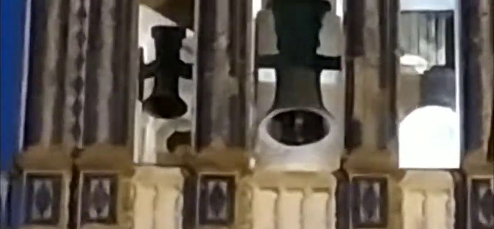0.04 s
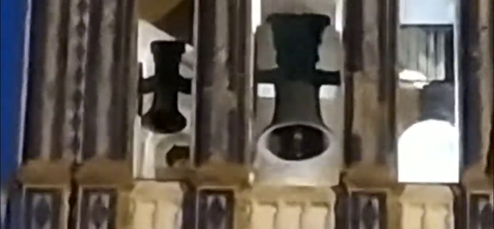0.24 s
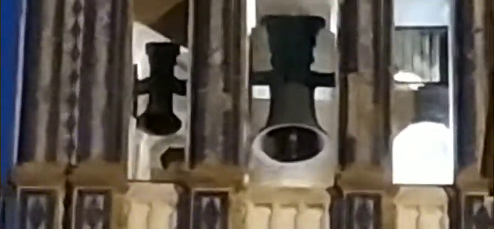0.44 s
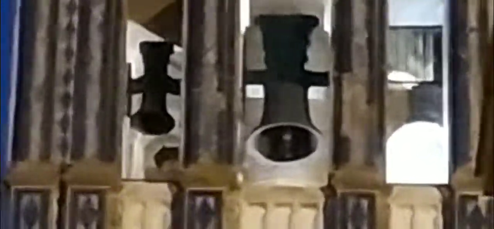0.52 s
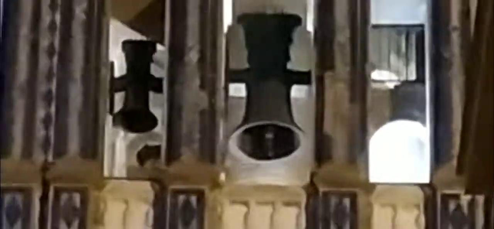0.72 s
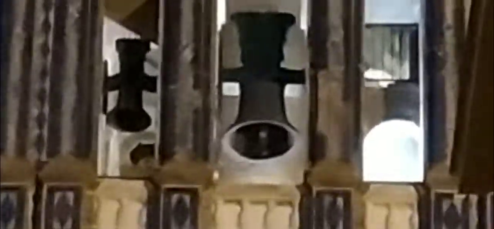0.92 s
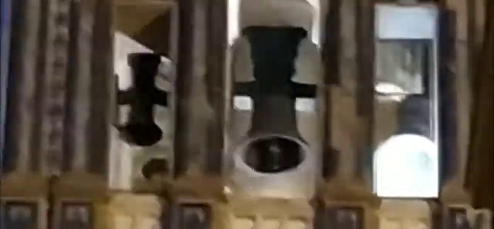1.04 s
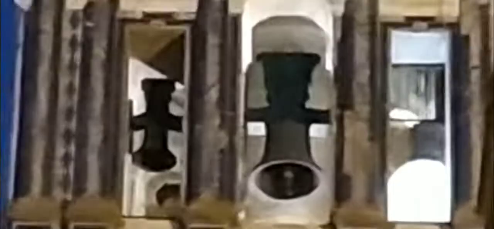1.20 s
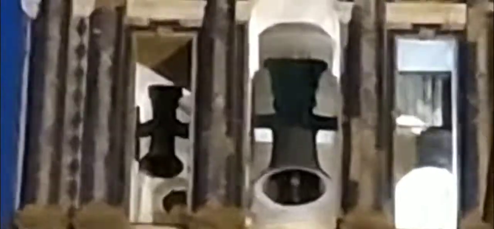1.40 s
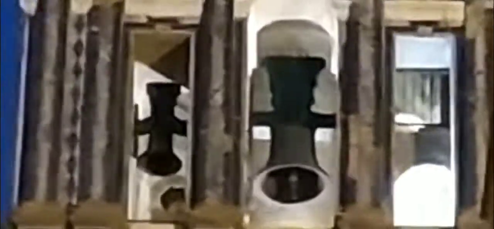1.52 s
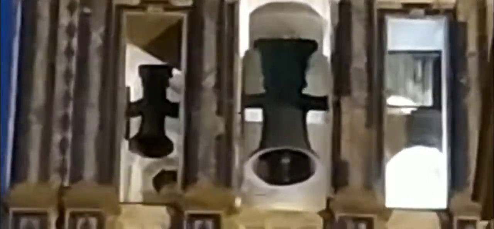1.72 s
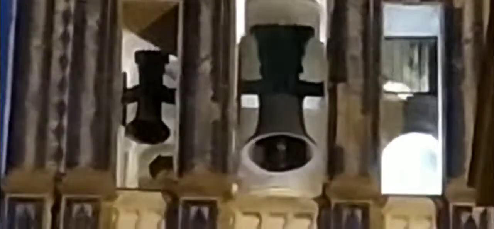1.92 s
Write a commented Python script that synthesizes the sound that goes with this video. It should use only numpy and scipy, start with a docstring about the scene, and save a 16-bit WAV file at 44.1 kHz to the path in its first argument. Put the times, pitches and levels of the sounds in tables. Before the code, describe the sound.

A large church bell is struck once at about 0.15 seconds, over quiet night air and a faint hum from earlier ringing. The clang echoes around the stone tower and square, then rings on in wavering tones. One high tone swells near 0.7 seconds. From about 1.2 seconds a faint rustle flickers close on the left, while the fading bell is still ringing at 2 seconds.

```python
"""Night air hangs over a square, with a faint hum left from earlier bell ringing.
At 0.15 s the clapper strikes a large church bell once, high in a stone tower, and the belfry and
the square smear the clang. The bronze rings on in long, beating tones and a crowd of short ones.
Half a second after the blow one high tone flares up. From about 1.2 s, as the bell fades,
a soft rustle comes up close by on the left."""
import sys
import numpy as np
from scipy import signal
from scipy.io import wavfile
from scipy.ndimage import uniform_filter1d

SR = 44100
rng = np.random.default_rng(int(sys.argv[2]) if len(sys.argv) > 2 else 0)


def dump(signal):
    """Clip the signal to [-1, 1] and save it as 16-bit WAV at the path in sys.argv[1]."""
    limited = np.clip(np.atleast_2d(signal).T, -1, 1)
    pcm = np.round(limited * 32767).astype(np.int16)
    wavfile.write(sys.argv[1], SR, pcm)


N = 85995
TIME = np.arange(N) / SR
STRIKE_S = .151


def amp(db):
    """Turns decibels into a number to multiply by."""
    return 10 ** (np.asarray(db) / 20)


def evened(x):
    """Scales a signal to an average (rms) size of 1."""
    return x / np.sqrt(np.mean(abs(x) ** 2) + 1e-20)


def read(table, hz):
    """Looks up a frequency in a table, sliding between rows by pitch."""
    row_hz, value = np.transpose(table)
    return np.interp(np.log(hz + 1), np.log(row_hz + 1), value)


def sides(pan_db):
    """Left and right gains with the same total power; positive leans left."""
    gains = np.array([amp(pan_db / 2), amp(-pan_db / 2)])
    return gains / np.sqrt(np.mean(gains ** 2, 0))


def swell(t, rise_s):
    """A smooth rise from 0 to 1."""
    return np.sin(np.pi / 2 * np.clip(t / rise_s, 0, 1)) ** 2


def fade(t, fade_s):
    """Dies away from time zero, losing 60 dB in each fade time."""
    return np.exp(-np.log(1000) * np.maximum(t, 0) / fade_s)


# How alike noise is on the left and right: (frequency [Hz], likeness [0 to 1])
SIDE_LIKENESS = [(30, 0.58), (150, 0.53), (1000, 0.64), (4000, 0.14), (12000, .2)]

def noise(colour, shape=None, size=1024):
    """Stereo noise with a given colour and an rms of 1, then multiplied by shape(hz, t) if given."""
    hop = size // 4
    hz, t = np.fft.rfftfreq(size, 1 / SR), np.arange(N // hop + 5) * hop / SR
    a, b, c, d = rng.standard_normal((len(t), len(hz), 4)).T
    likeness = read(SIDE_LIKENESS, hz)[:, None]
    left = a + 1j * b
    right = likeness * left + np.sqrt(1 - likeness ** 2) * (c + 1j * d)
    bands = np.array([left, right]) * amp(read(colour, hz))[:, None]
    to_wave = lambda z: signal.istft(z, nperseg=size, noverlap=size - hop)[1][:, :N]
    scale = to_wave(bands).std()
    if shape:
        bands = bands * shape(hz, t)
    return to_wave(bands) / scale


# The colour of the night air: (frequency [Hz], relative level [dB])
AIR_COLOUR = [(15, -59), (25, -22), (75, -9.5), (109, -11.5), (146, -13), (219, -15), (927, -23),
              (1030, -29), (1150, -25.5), (1720, -29.5), (15000, -51.5)]

def night_air(level_db=-55.5):
    """A steady, low hush, a little to the right."""
    return amp(level_db) * noise(AIR_COLOUR, size=2048) * sides(pan_db=-3)[:, None]


# Tones still sounding from earlier strokes: (frequency [Hz], level [dB], fade time [s])
HUM_TONES = [(145.4, -55, 55), (157, -61.5, 120), (324.3, -56.5, 30), (401.5, -58.5, 26), (638, -64, 13),
             (782, -64.5, 3.6), (963, -65, 4)]

def lingering_hum():
    """The faint hum of bronze that is already ringing."""
    return sum(amp(db) * fade(TIME, fade_s) * np.sin(2 * np.pi * (hz * TIME + rng.random()))
               for hz, db, fade_s in HUM_TONES)


# The colour of the clang in the belfry: (frequency [Hz], relative level [dB])
CLANG_COLOUR = [(60, -46), (200, -13), (500, -20.5), (750, -9.5), (1400, -2), (2400, -11.5), (4000, -5),
                (5400, -6.5), (7000, -32.5), (9000, -20.5), (12000, -37), (15000, -65)]
# How long the clang lasts: (frequency [Hz], fade time [s])
CLANG_FADE = [(200, 1.5), (800, 1.05), (2000, 1.0), (5000, .7), (8000, .33), (13000, .26)]
# The clang's narrow, metallic peaks and dips: (frequency [Hz], typical depth [dB])
CLANG_PEAKS = [(300, 1), (1500, 2.5), (4000, 4.5), (7000, 6), (12000, 7)]
# Which way the clang and the short tones lean: (frequency [Hz], left minus right [dB])
STRIKE_PAN = [(100, 0), (500, 1.5), (1500, 1), (2800, -1), (4000, -10), (5000, -3.5), (6500, -7.5),
              (8000, 9), (14000, 22)]

def clang(gain_db=-29.5):
    """The clapper's crash, hard at first and then scattered by the stonework."""
    def metallic_fade(hz, times):
        ripple = evened(uniform_filter1d(rng.standard_normal(len(hz)), size=2))
        peaks = amp(read(CLANG_PEAKS, hz) * ripple)
        peaks /= np.sqrt(uniform_filter1d(peaks ** 2, size=12))  # keeps the overall colour
        gains = peaks * sides(read(STRIKE_PAN, hz))
        return gains[:, :, None] * fade(times - STRIKE_S, read(CLANG_FADE, hz)[:, None])

    t = TIME - STRIKE_S
    direct = amp(-15) * swell(t + .005, rise_s=.00084)  # weak, and 5 ms ahead of the echoes
    crack = amp(-11) * fade(t, fade_s=.053)  # the hard first instant
    echoes = swell(t, rise_s=.0076) * (1 + crack)
    return amp(gain_db) * (direct + echoes) * noise(CLANG_COLOUR, metallic_fade)


# The bell's strong tones:
# (frequency [Hz], base level [dB], fade time [s], swell time [s], left minus right [dB])
BELL_TONES = [(320.3,-44,30,0.13,-0.5),(386.6,-45.5,14,0.16,2),(401.3,-54.5,12.5,0.11,-10),(418.3,-52,19,0.14,6),(620,-51.5,8.6,0.013,-10.5),(675.9,-35.5,5.08,0.0034,-1),(709.6,-45,4.4,0.038,12),(760.5,-33,3.22,0.24,-4.5),(850.7,-41.5,4.13,0.057,1.5),(891.3,-39,2.5,0.074,-8),(904.9,-38.5,1.8,0.062,-2.5),(920,-37,1,.05,1),(1027.7,-33,3.92,0.26,-3.5),(1053.7,-41,5.1,.17,-8),(1210,-39,2.1,0.11,-7.5),(1257,-46,3.2,0.11,4),(1280,-39,2.95,.03,15),(1426.7,-30,3.33,0.057,7),(1433.5,-39,2.9,0.015,0),(1441.6,-34.5,3.9,0.035,12),(1491.4,-30.5,1.6,.05,-3.5),(1524,-41,2.84,.05,-1),(1744,-44.5,2.3,.08,2),(1824,-39,1.7,0.023,-10),(1859.2,-28.5,4,0.063,-0.5),(1871.2,-45.5,4.2,.03,-4.5),(1906.4,-29.5,2.69,0.14,-14.5),(1950,-38,1.6,.01,2.5),(1963.5,-37.5,4.2,.015,1.5),(2242,-52,2.7,.02,-4),(2210,-51,1,.02,-0.5),(2320,-28.5,1.09,0.018,1.5),(2365,-29.5,2.5,0.0033,-7),(2383,-42.5,2.4,0.0046,-4.5),(2538.5,-49.5,5.7,.02,-7.5),(2647,-48.5,2,0.022,-1),(2835,-43.5,2.3,0.28,-4),(2864,-34.5,2.72,0.069,0.5),(2842,-30,1.54,.17,-8),(2985,-42,2.1,0.22,-11.5),(3170,-39.5,2.47,.03,-3.5),(3353,-36.5,2.1,0.0057,-5),(3377,-33.5,2.66,0.0059,-7.5),(3454,-42.5,1,.01,-3),(3644,-44.5,2.7,0.024,-3),(3684,-44,3.6,0.016,-14.5),(3880,-38.5,2.1,0.0035,-7.5),(4172.6,-38.5,1.4,0.013,-14.5),(4430,-41,2.1,0.032,-8.5),(4660,-45,1.75,0.027,-10),(4950,-38.5,1.44,0.07,-13),(5076.3,-41.5,1.43,0.11,-8),(5320,-50,1.4,.02,-4.5),(5430,-48.5,1.5,0.018,-11),(5480,-49,1.8,0.016,-15.5),(5550,-55,1,0.023,-14),(6030,-46.5,1.3,0.027,1),(6200,-60.5,1.1,.02,0.5),(6460,-48,1.4,0.013,2),(7040,-62,1.4,0.026,-3.5),(7250,-60,1.2,.02,-11),(7495,-54.5,0.98,0.017,1),(7819,-54.5,1.13,.02,13.5),(8450,-61,0.83,.02,17),(8350,-65,1.2,.02,3),(9000,-70.5,1,.01,6.5),(10550,-71,.8,.01,15),(10910,-71.5,1,.01,14),(11476,-73,.8,.01,14.5)]
# How the trip down to the square colours them: (frequency [Hz], boost [dB])
PATH_COLOUR = [(300, 3), (700, 2.5), (1400, 2), (2400, 3.5), (4000, 1), (6000, 6.5), (11000, 5.5)]
# Late on, the upper tones sink faster: (frequency [Hz], extra level change [dB per s])
LATE_DIMMING = [(700, 0.5), (1400, -1.5), (2300, -14), (4000, -13), (11000, -6)]
# How far out of step a tone is between left and right: (frequency [Hz], phase gap [radians])
SIDE_PHASE = [(150, 0.14), (400, 0.46), (1000, 1.1), (2500, 0.69), (5000, 2.1), (15000, 5.6)]

def bell_tones(twin_gain=.24, typical_beat_hz=7.6, waver_depth=.13, waver_hz=.83, dim_from_s=1.34):
    """Each strong tone swells as echoes gather, beats against a weak twin, wavers and dies away."""
    step = 128  # samples between updates of the slow changes
    slow_time = np.arange(N // step + 2) * step / SR
    t, rate_hz = slow_time - STRIKE_S, np.fft.fftfreq(len(slow_time), step / SR)
    left_lead_s = .00002  # the sound reaches the left side slightly first
    out = np.zeros((2, N))
    for hz, db, fade_s, rise_s, pan_db in BELL_TONES:
        jitter = rng.standard_normal((3, len(t), 2)) @ [1, 1j]
        drift = evened(np.fft.ifft(jitter / (1 + (rate_hz / waver_hz) ** 2)))
        waver = waver_depth * (drift[0] + drift[1:])  # one shared drift, plus one for each side
        start, twin_start, beat, side = rng.random(4)
        # The bell is not quite round, so each tone has a twin a few Hz away.
        twin = twin_gain * np.exp(2j * np.pi * (typical_beat_hz * (.5 + beat) * t + twin_start))
        gains = amp(db + read(PATH_COLOUR, hz)) * sides(pan_db)[:, None]
        ring = (1 + twin + waver) * gains * swell(t, rise_s) * fade(t, fade_s)
        ring *= amp(read(LATE_DIMMING, hz) * np.maximum(slow_time - dim_from_s, 0))
        phase_gap = np.sign(side - .5) * read(SIDE_PHASE, hz) - 2 * np.pi * hz * left_lead_s
        ring[1] *= np.exp(1j * phase_gap)
        tone = np.exp(2j * np.pi * (hz * TIME + start))
        out += [(np.interp(TIME, slow_time, channel) * tone).real for channel in ring]
    return out


# The bell's crowd of weak, short tones: (frequency [Hz], typical level of each [dB])
SHIMMER_LEVEL = [(300, -54.5), (560, -69.5), (800, -48.5), (1300, -58), (2100, -56.5), (3000, -51.5),
                 (4500, -45), (5400, -59), (6500, -59.5), (8200, -65.5), (9500, -81.5), (12500, -81)]
# How long they last: (frequency [Hz], fade time [s])
SHIMMER_FADE = [(500, 1.6), (1500, 2.56), (3000, 1.3), (5000, 1.62), (8000, 1.13), (12500, .8)]
TONE_RISE_S = .0047

def shimmer(count=240, scatter_db=4.0):
    """Many weak vibrations at unrelated pitches give the strike its metallic shimmer."""
    t, out = TIME - STRIKE_S, np.zeros((2, N))
    low, high = np.sqrt(SHIMMER_LEVEL[0][0]), np.sqrt(SHIMMER_LEVEL[-1][0])
    for k in range(count):
        place, start = rng.random(2)
        strength, lean, lag = rng.standard_normal(3)
        hz = (low + (high - low) * (k + place) / count) ** 2  # low tones sit closer together
        phase = 2 * np.pi * (hz * t + start) + np.array([[0], [lag * read(SIDE_PHASE, hz)]])
        gain = amp(read(SHIMMER_LEVEL, hz) + scatter_db * strength)
        pan = sides(read(STRIKE_PAN, hz) + scatter_db * lean)[:, None]
        out += gain * pan * fade(t, read(SHIMMER_FADE, hz)) * np.sin(phase)
    return out * swell(t, TONE_RISE_S)


# The rise and fall of one high bell tone: (time [s], level [dB])
FLARE_LEVEL = [(.5, -73), (.62, -52), (.69, -41), (.88, -47.5), (1.0, -58.5), (1.1, -53.5), (1.3, -64),
               (1.65, -64), (1.95, -76)]

def high_flare(hz=3898):
    """One high tone swells half a second after the blow, mostly on the right."""
    tone = np.sin(2 * np.pi * (hz * TIME + rng.random())) * swell(TIME - STRIKE_S, TONE_RISE_S)
    level_db = np.interp(TIME, *np.transpose(FLARE_LEVEL))
    return amp(level_db) * tone * sides(pan_db=-14)[:, None]


# The colour of the rustle: (frequency [Hz], relative level [dB])
RUSTLE_COLOUR = [(1500, -39), (3500, 3.5), (5000, 0.5), (6500, -7.5), (9000, 1.5), (13000, -2.5),
                 (15500, -5.5)]
# The rustle starts near silence and comes up late: (time [s], level [dB])
RUSTLE_LEVEL = [(0, -83.5), (1.0, -79), (1.2, -67), (1.38, -67.5), (1.44, -57.5), (1.52, -70.5),
                (1.57, -69), (1.6, -59), (1.65, -70), (1.71, -69.5), (1.745, -58), (1.79, -70.5),
                (1.95, -65.5)]

def rustle(flutter_db=1.8, grain_s=.018):
    """A soft, high hiss that flickers unevenly, close by on the left."""
    flutter = np.interp(TIME / grain_s, np.arange(N), rng.standard_normal(N))
    level_db = np.interp(TIME, *np.transpose(RUSTLE_LEVEL)) + flutter_db * flutter
    return amp(level_db) * noise(RUSTLE_COLOUR) * sides(pan_db=9)[:, None]


def scene():
    """One stroke of the bell over the quiet square."""
    return night_air() + lingering_hum() + clang() + bell_tones() + shimmer() + high_flare() + rustle()


def record(dry):
    """Cuts away the very highest treble, above 15500 Hz."""
    low_pass = signal.firwin(511, 15500, window=("kaiser", 9), fs=SR)
    return signal.oaconvolve(dry, low_pass[None], "same")


dry = scene()
out = record(dry)
dump(out)
```